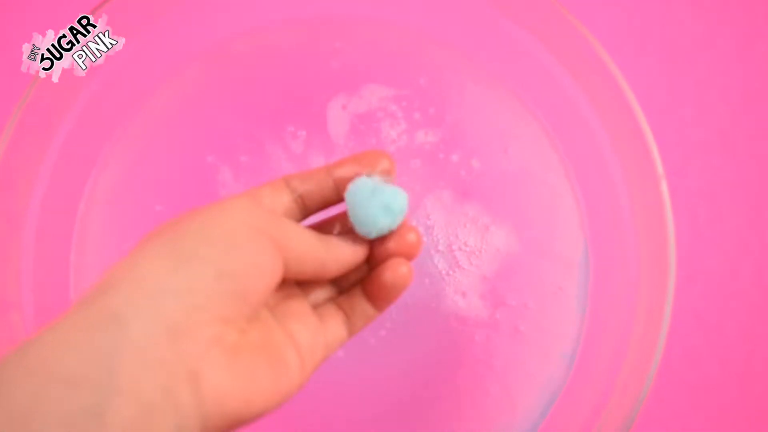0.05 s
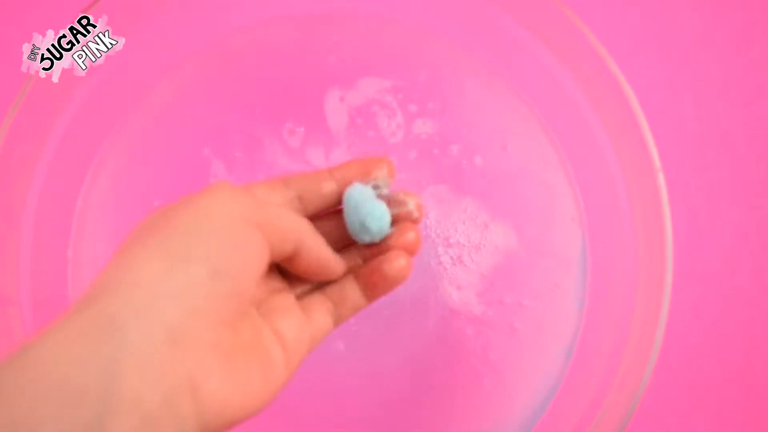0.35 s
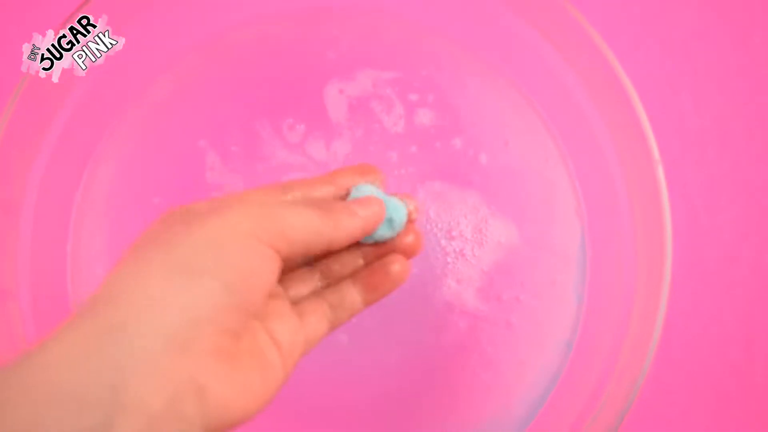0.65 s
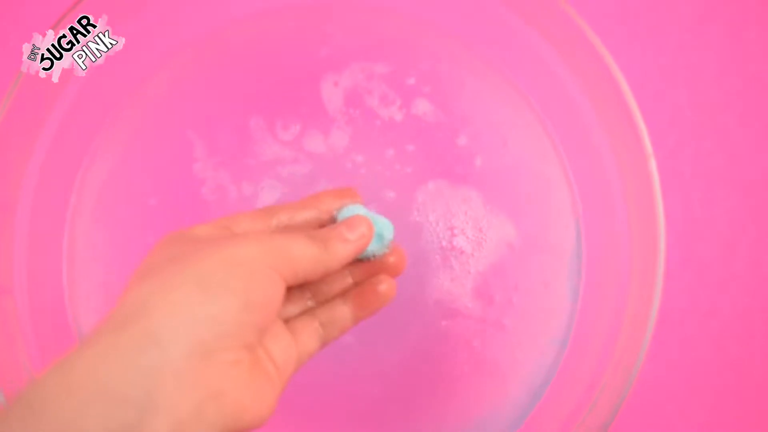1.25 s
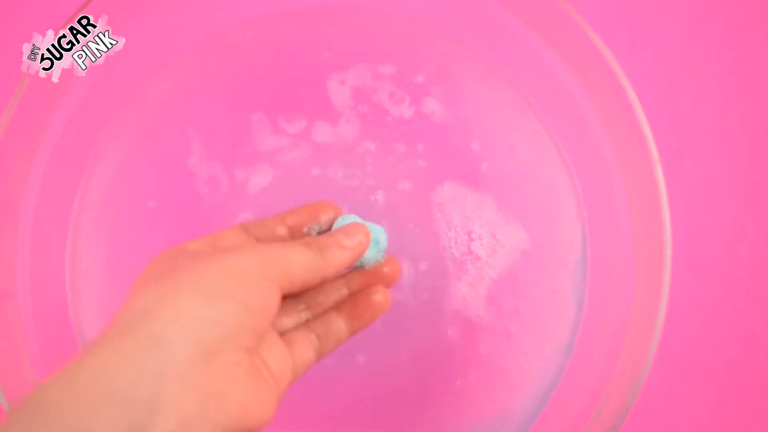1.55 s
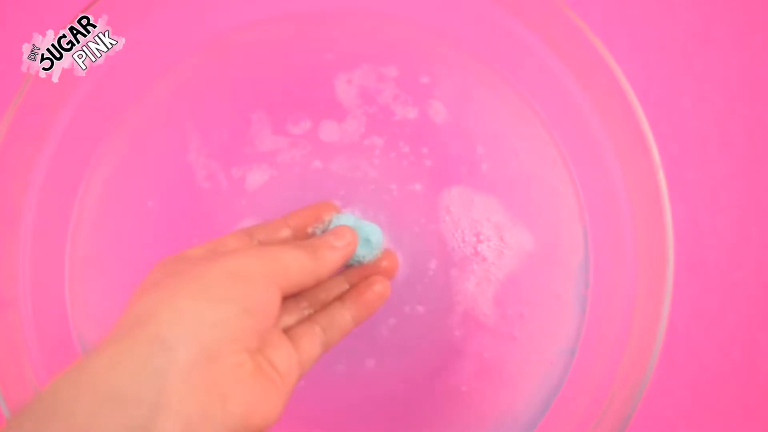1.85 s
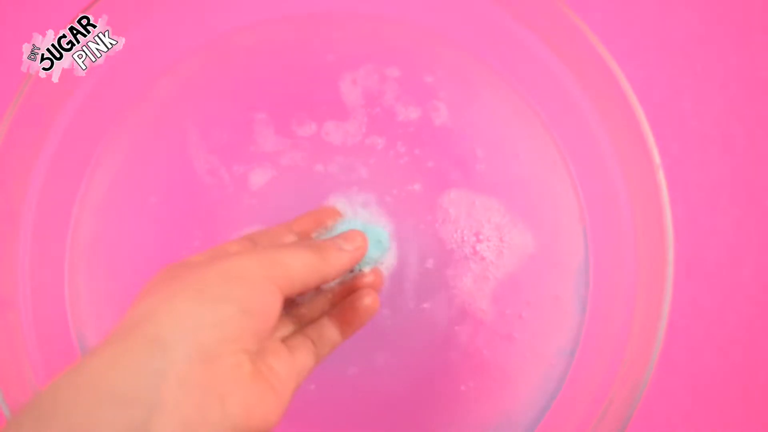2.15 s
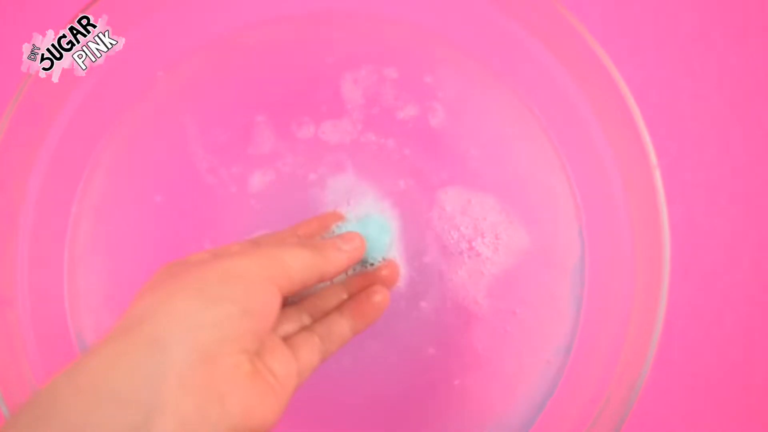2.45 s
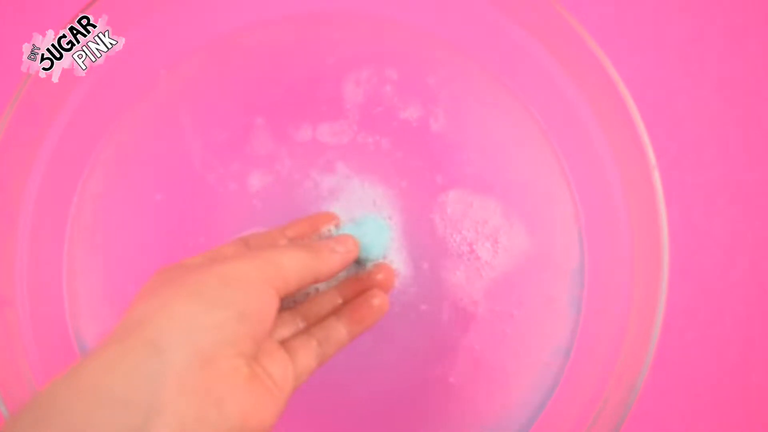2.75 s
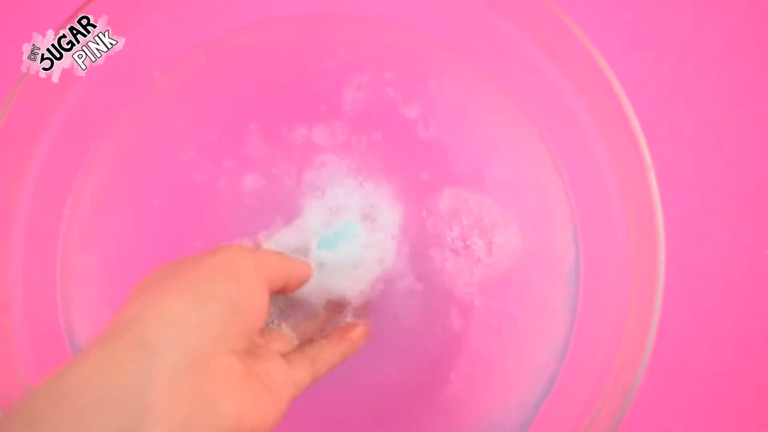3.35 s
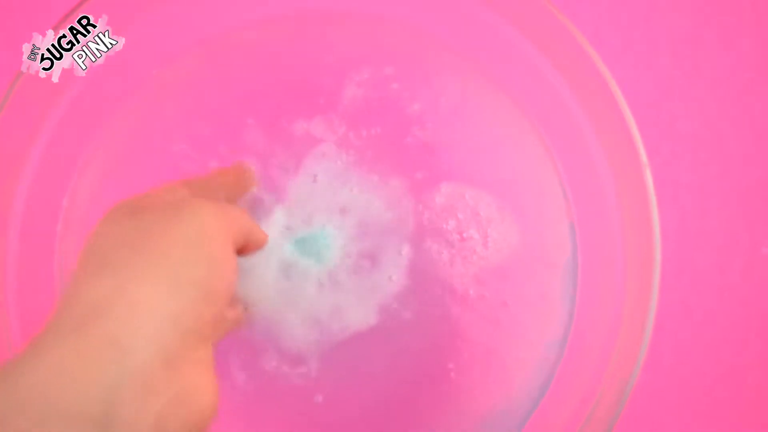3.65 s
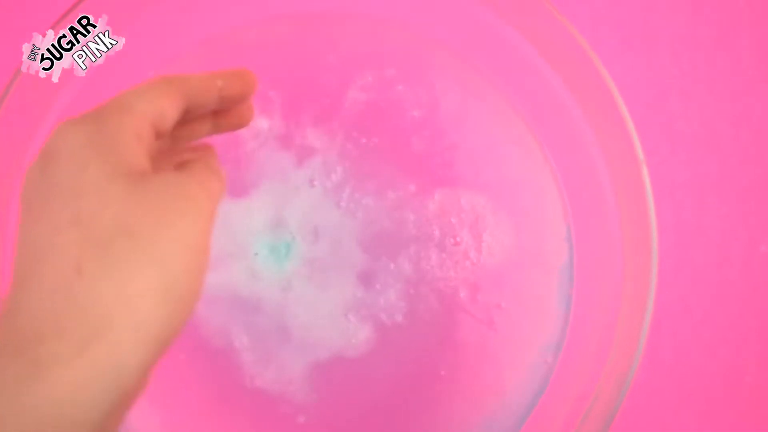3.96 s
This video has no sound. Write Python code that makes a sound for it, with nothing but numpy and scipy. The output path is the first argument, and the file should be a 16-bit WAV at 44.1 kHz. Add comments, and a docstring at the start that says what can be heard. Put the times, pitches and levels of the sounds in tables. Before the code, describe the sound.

A bath bomb fizzes in a bowl of water, close by in a quiet room. At first there is only a fine, faint hiss. Around 1 second the bomb gets wet with a few tiny ticks, and a sharper tick follows at 1.5 seconds. From 2 seconds the fizz grows, slightly hollow. Near 3.4 seconds comes a soft rush of foam, and the fizz stays louder and open until 4 seconds.

```python
"""In a quiet room, a small bath bomb is dipped into a bowl of water, heard from close by.
Crumbs already afloat hiss finely; the bomb gets wet, ticks, and fizzes harder and harder
between the fingers. When they let go, the foam spreads with a soft rush and the fizz opens up.
The fizz is thousands of tiny bubbles popping; the ticks are big bubbles and the snapping crust."""
import sys
import numpy as np
from scipy import signal
from scipy.fft import rfft, irfft
from scipy.io import wavfile

SR = 44100
rng = np.random.default_rng(int(sys.argv[2]) if len(sys.argv) > 2 else 0)


def dump_mix(stems):
    """Bounce the given channels to the path in sys.argv[1] as a 16-bit WAV at rate SR."""
    frames = np.atleast_2d(stems).T  # one column per channel
    limited = np.clip(frames, -1, 1)  # hard clip at full scale
    pcm = np.round(limited * 32767).astype(np.int16)
    wavfile.write(sys.argv[1], SR, pcm)


N = 176400
TIME = np.arange(N) / SR


def fizz(level, colour, **pop_settings):
    """A cloud of bubbles pops: the foam's tone keeps shifting and the gas comes out unevenly."""
    patch_db, patch_hz, patch_s = 0.85, 263, 0.21
    flutter_db, flutter_s = 0.64, 0.005
    spectrum = signal.stft(pops(**pop_settings), nperseg=1024)[2]
    bin_hz, frame_s = SR / 1024, 512 / SR
    # Random patches of pitch and time get a little louder or softer.
    patches = smoothed(rng.standard_normal(spectrum.shape), patch_hz / bin_hz)
    patches = smoothed(patches, patch_s / frame_s, axis=1)
    cloud = signal.istft(spectrum * amp(patch_db * patches))[1][:N]
    flutter = flutter_db * smoothed(rng.standard_normal(N), flutter_s * SR)
    level_db = np.interp(TIME, *np.transpose(level))
    return coloured(echoed(cloud), colour) * amp(level_db + flutter)


def held_bomb():
    """The bomb gets wet, then fizzes harder and harder between the fingers."""
    # Loudness of the first wetting and of the held fizz (time [s], level [dB])
    wetting_level = [(0, -80), (.9, -76), (1.01, -66), (1.05, -52.5), (1.11, -54.5), (1.27, -52.5),
                     (1.35, -47.5), (1.39, -50.5), (1.53, -49.5), (1.62, -56.5), (1.9, -59), (4, -86)]
    held_level = [(0, -90), (1.4, -65), (1.65, -55), (1.92, -53), (2.03, -47), (2.2, -45.5), (2.38, -43.5),
                  (2.8, -42.5), (3.02, -42), (3.16, -45.5), (3.3, -54), (4, -70)]
    # Their tone (pitch [Hz], level [dB])
    wetting_colour = [(1500, -27), (2850, -8.5), (3130, -10), (3400, -5.5), (4450, -1), (5000, -3.5),
                      (5600, 3), (6250, -2.5), (6900, -1), (7900, -6), (9000, -0.5), (10500, -8),
                      (15700, -15)]
    held_colour = [(600, -33), (1600, -34), (2500, -20), (2900, -6.5), (3120, -8.5), (3350, -1), (3800, 0),
                   (4100, 1.5), (4550, -3), (5020, -6.5), (5450, -4.5), (5750, 1.7), (6150, -4),
                   (6380, -1.7), (6700, -4), (7350, -.5), (7750, -5), (8300, -3), (9700, -6), (10500, -8.5),
                   (13600, -9), (15700, -17)]
    wetting = fizz(wetting_level, wetting_colour, per_s=6000, spread_db=4)
    return wetting + fizz(held_level, held_colour)


def finger_gap():
    """The fizz rings in the hollow between the fingers, and higher as the gap narrows."""
    # Loudness in the wide and the narrow gap (time [s], level [dB])
    wide_level = [(0, -100), (1.9, -66), (2.15, -56), (2.45, -52), (2.65, -55.5), (2.92, -54),
                  (3.06, -54.5), (3.14, -62), (3.26, -60), (4, -87)]
    narrow_level = [(0, -110), (2.9, -60), (3.15, -44), (3.28, -43), (3.5, -55), (4, -77)]
    # Their tone (pitch [Hz], level [dB])
    wide_colour = [(300, -31), (600, -19.5), (900, -6.5), (1250, -8.5), (1620, -16.5), (1820, -6),
                   (1990, -8), (2120, -6.5), (2400, -4), (2550, -7.5), (2850, 1), (3150, -3), (4500, -21),
                   (15000, -59)]
    narrow_colour = [(1000, -35), (2500, -19), (3130, -11), (3450, -4), (4300, 2.5), (4950, -8),
                     (5620, 2.5), (6100, -1), (8400, 1), (9500, -2.5), (13600, -5.5), (15700, -15)]
    return fizz(wide_level, wide_colour) + fizz(narrow_level, narrow_colour)


def free_bomb():
    """Once the fingers let go, the fizz is loud and open."""
    # Loudness of the fizz (time [s], level [dB])
    level = [(0, -100), (3.1, -70), (3.29, -52), (3.35, -42), (3.46, -40), (3.55, -38.5), (3.75, -39),
             (4, -38)]
    # Its tone (pitch [Hz], level [dB])
    colour = [(300, -43), (850, -15), (1200, -18.5), (1550, -14), (1760, -10.5), (2000, -18), (2370, -8),
              (2540, -11), (2950, -5.5), (3200, 1), (3500, -2), (3700, -0.5), (4400, -0.5), (4850, -5),
              (5400, -3), (5680, -2), (5950, -2.5), (6750, -1.5), (7500, -0.5), (7800, -2), (8500, -3),
              (10900, -7), (12800, -5.5), (14000, -7.5), (15700, -13.5)]
    return fizz(level, colour)


def crumbs():
    """Floating crumbs hiss finely all the way through."""
    # Loudness of the hiss (time [s], level [dB])
    level = [(0, -48), (.4, -48.5), (.73, -49), (.8, -49), (1.05, -48), (1.15, -51.5), (1.5, -50),
             (1.75, -53.5), (2.1, -53), (4, -48.5)]
    # Its tone (pitch [Hz], level [dB])
    colour = [(600, -18), (1300, -10.5), (2200, -5.5), (2900, -5.5), (3950, -8), (4300, -1.5), (5400, -3.5),
              (6100, -3), (7500, 0.5), (8700, -1), (9700, 0), (10500, -2), (12000, -0.5), (13000, 1),
              (14300, -2), (15700, -6)]
    return fizz(level, colour)


def ticks():
    """Big bubbles ring with a rising pitch and the dry crust snaps; the bowl echoes both."""
    # Bursting bubbles (time [s], level [dB], pitch [Hz], ring time [s])
    bursts = [(1.044, -40, 4800, .01), (1.051, -44, 4700, .012), (1.057, -41, 4700, 0.0075),
              (1.066, -42, 6600, .01), (1.488, -24.5, 4150, .0016), (1.493, -26.5, 5450, 0.0046),
              (1.4975, -39, 5600, .007)]
    # Snaps of the crumbling bomb (time [s], level [dB], pitch [Hz])
    snaps = [(1.0187, -38, 8000), (1.0776, -36, 2620), (1.0796, -34, 7600), (1.0895, -45, 3000),
             (1.181, -35.5, 4830), (1.489, -37, 3450)]
    rise_s, glide_per_s, snap_s = 0.0005, 14, 0.00017
    overtone_ratio, overtone_db = 1.64, -6.5
    out, t = np.zeros(N), np.arange(SR // 20) / SR
    for start, db, hz, ring_s in bursts:
        phase = 2 * np.pi * hz * (t + glide_per_s * np.minimum(t, ring_s) ** 2 / 2)
        tone = np.sin(phase) + amp(overtone_db) * np.sin(overtone_ratio * phase)
        fade = amp(-60 * np.maximum(t - rise_s, 0) / ring_s)
        add(out, start, amp(db) * np.minimum(t / rise_s, 1) * fade * tone)
    for start, db, hz in snaps:
        pulse = t / snap_s * np.exp(1 - t / snap_s)
        add(out, start, amp(db) * pulse * np.sin(2 * np.pi * hz * t))
    return echoed(out, fade_s=0.046, echo_db=-9.5, samples=len(t))


def singing():
    """Pops set off ringing notes in the fizz that swell and fade."""
    # Notes in the fizz (start [s], end [s], pitch [Hz], level [dB])
    notes = [(-.3, .5, 9600, -58.5), (.1, 1.05, 4290, -66), (.42, 0.79, 6700, -60), (.52, .82, 2410, -71),
             (.62, .88, 11000, -60), (.8, 0.83, 6500, -67), (1, 1.1, 4700, -55.5), (1.17, 1.8, 7170, -65),
             (1.58, 1.68, 3000, -62), (1.65, 1.774, 2920, -59), (1.775, 1.98, 2860, -66),
             (3.016, 3.32, 3020, -59.5), (3.326, 3.62, 3240, -50), (3.68, 3.822, 3215, -54.5),
             (2.763, 2.86, 2850, -53), (-.3, .5, 2030, -71)]
    out = np.zeros(N)
    for start, end, hz, db in notes:
        swell = np.sin(np.pi * np.clip((TIME - start) / (end - start), 0, 1))
        out += amp(db) * swell * ringing(pops(), hz, width_hz=hz / 17)
    return out


def rush():
    """Foam rushes out from under the opening fingers and the water gulps."""
    # Tone of the foam (pitch [Hz], level [dB])
    colour = [(25, -23), (65, -9), (110, -9), (190, -4), (330, -2), (700, 2), (1500, 2), (2500, 1),
              (5000, -14), (15000, -44)]
    # Low gulps of water (middle [s], length [s], pitch [Hz], level [dB])
    gulps = [(3.387, .12, 211.6, -60), (3.412, 0.17, 66, -72), (3.439, 0.14, 418, -59),
             (3.531, .12, 272, -67)]
    peak_s, rise_s, fall_s, peak_db = 3.4, 0.044, 0.08, -50
    since = TIME - peak_s
    swell = 1 / np.cosh(since / np.where(since < 0, rise_s, fall_s))
    out = amp(peak_db) * swell * coloured(pops(per_s=5000, spread_db=1.4), colour)
    for middle, length, hz, db in gulps:
        t = np.arange(0, length, 1 / SR)
        add(out, middle - length / 2, amp(db) * np.hanning(len(t)) * np.sin(2 * np.pi * hz * t))
    return out


def room():
    """A quiet hush with a few low hums and a soft drone that dies away."""
    # Tone of the hush (pitch [Hz], level [dB])
    colour = [(20, -7), (35, -20), (60, -16), (110, -5), (190, -5), (270, -2), (480, -0.5), (650, 1),
              (1100, -0.5), (2000, -7.5), (5000, -6), (15000, -15)]
    # Faint hums (pitch [Hz], width [Hz], level [dB])
    hums = [(276, 32, -78.5), (341, 15, -79), (414.7, 19, -80), (496, 9.6, -81.5)]
    hush_db, drone_db, drone_end_s = -59.5, -69, 0.65
    hush = amp(hush_db) * coloured(echoed(rng.standard_normal(N)), colour)
    hum = sum(amp(db) * ringing(rng.standard_normal(N), hz, width) for hz, width, db in hums)
    drone = ringing(rng.standard_normal(N), centre_hz=480, width_hz=130)
    fade = np.clip(1 - (TIME / drone_end_s) ** 4, 0, 1)
    return hush + hum + amp(drone_db) * fade * drone


def pops(per_s=30000, spread_db=2.5):
    """Tiny bubbles burst at random, a few of them louder."""
    size = amp(spread_db * np.minimum(rng.exponential(1, N), 5))
    return size * rng.choice([-1, 1], N) * (rng.random(N) < per_s / SR)


def echoed(x, fade_s=0.1, echo_db=-13, samples=SR // 8):
    """The bowl and table send back many short echoes."""
    t = np.arange(samples) / SR
    echo = rng.standard_normal(samples) * amp(-60 * t / fade_s)
    return x + amp(echo_db) * signal.fftconvolve(x, echo / np.linalg.norm(echo))[:N]


def ringing(x, centre_hz, width_hz):
    """Makes a sound ring around one pitch, at strength 1."""
    hz = np.fft.rfftfreq(N, 1 / SR)
    return evened(irfft(rfft(x) / (1 + (2 * (hz - centre_hz) / width_hz) ** 2), N))


def coloured(x, colour):
    """Sets the balance of low and high pitches, at strength 1."""
    hz, db = np.transpose(colour)
    gain = amp(np.interp(np.log(np.fft.rfftfreq(N, 1 / SR) + 1), np.log(hz), db))
    return evened(irfft(rfft(x) * gain, N))


def smoothed(x, width, axis=0):
    """Blurs over a width in samples, at strength 1."""
    bell = np.exp(-2 * (np.fft.rfftfreq(x.shape[axis]) * width) ** 2)
    blurred = irfft(rfft(x.swapaxes(axis, -1)) * bell, x.shape[axis])
    return evened(blurred.swapaxes(axis, -1))


def evened(x):
    """Scales to an average strength (rms) of 1."""
    return x / np.sqrt(np.mean(x ** 2) + 1e-20)


def amp(db):
    """Turns decibels into a multiplier."""
    return 10 ** (np.asarray(db) / 20)


def add(mix, start_s, sound):
    """Mixes a sound in at a given time."""
    part = mix[round(start_s * SR):][:len(sound)]
    part += sound[:len(part)]


def scene():
    """All stages of the fizz over the room's hush, the same left and right."""
    fizzing = crumbs() + held_bomb() + finger_gap() + free_bomb()
    mono = fizzing + singing() + rush() + ticks() + room()
    return np.array([mono, mono])


def record(dry):
    """Cuts away the very highest treble."""
    edge_hz = 15750
    low_pass = signal.firwin(511, edge_hz, window=("kaiser", 9), fs=SR)
    return signal.oaconvolve(dry, low_pass[None], "same")


dry = scene()
out = record(dry)
dump_mix(out)
```